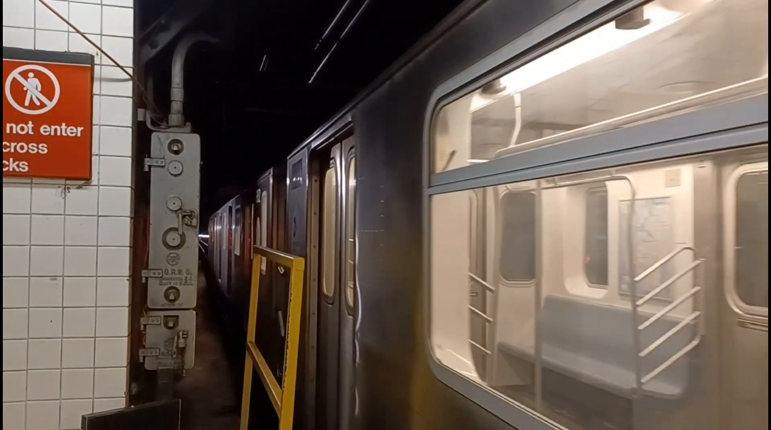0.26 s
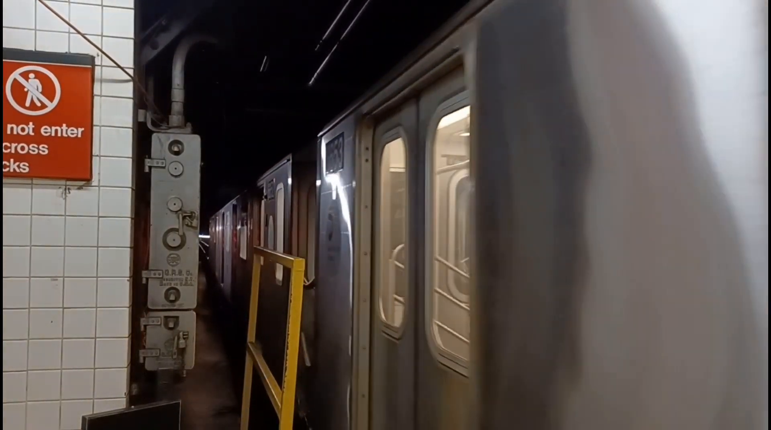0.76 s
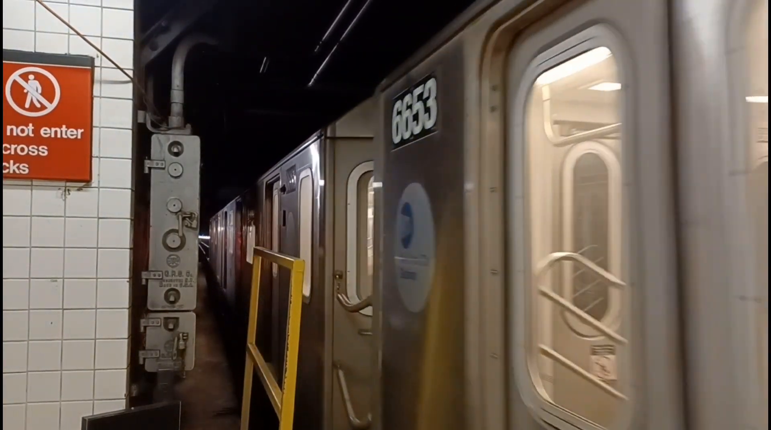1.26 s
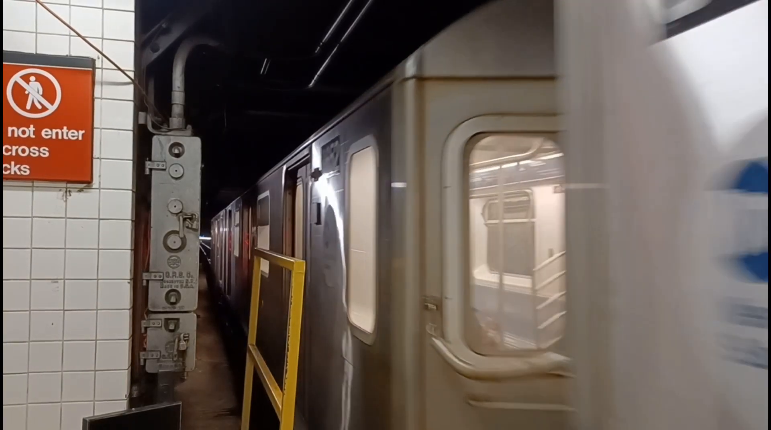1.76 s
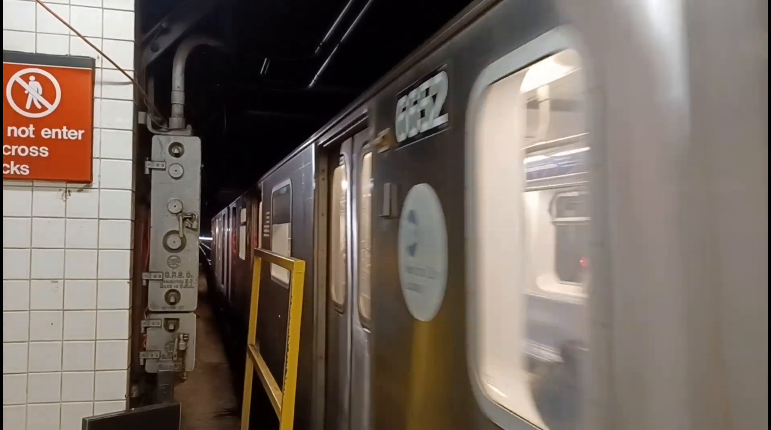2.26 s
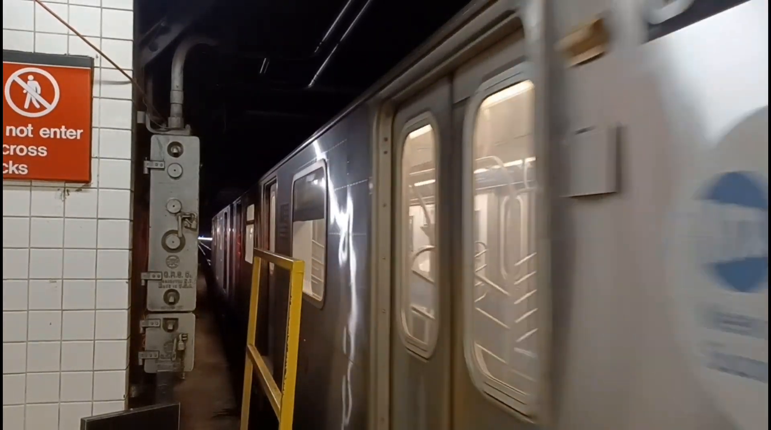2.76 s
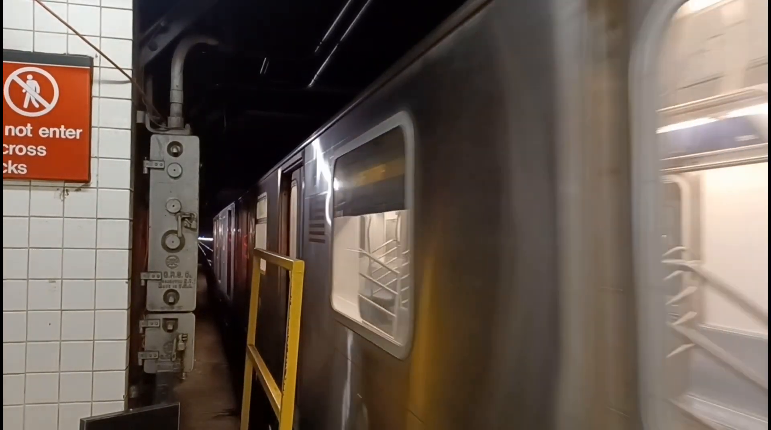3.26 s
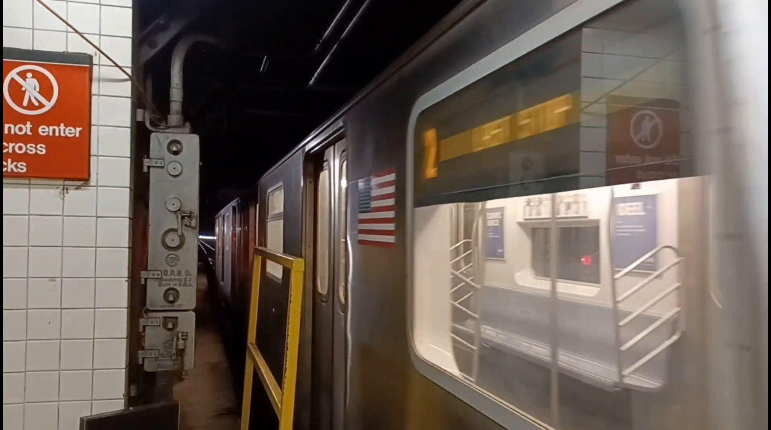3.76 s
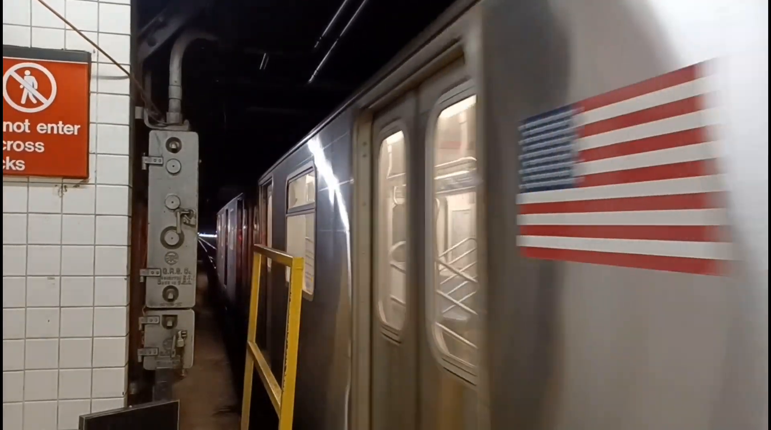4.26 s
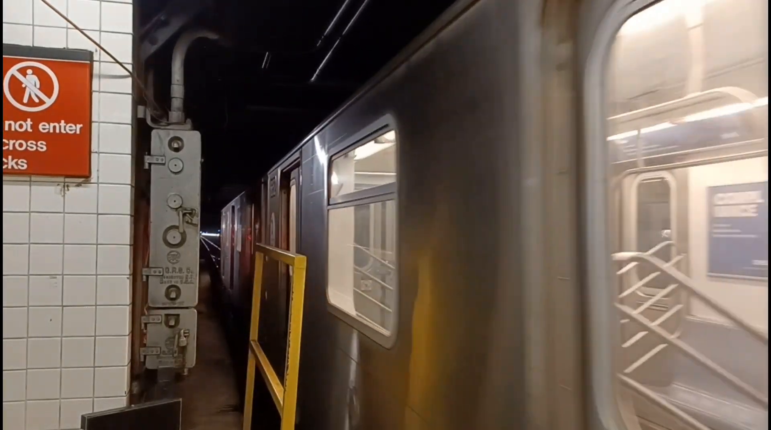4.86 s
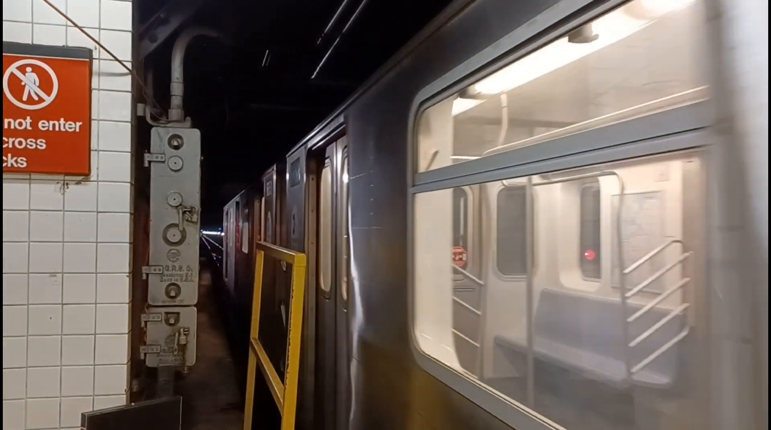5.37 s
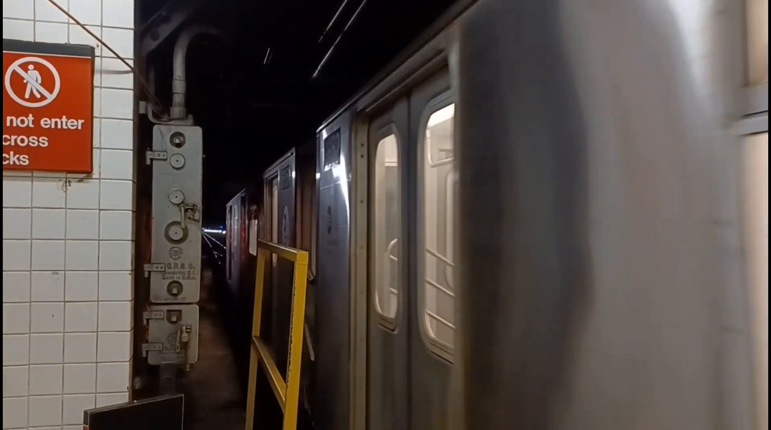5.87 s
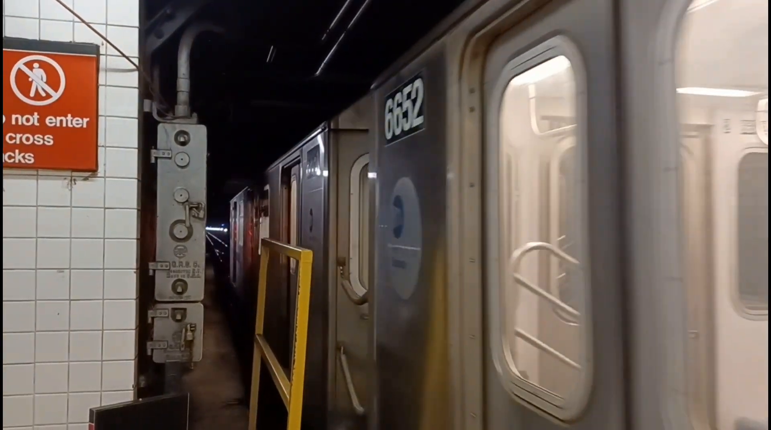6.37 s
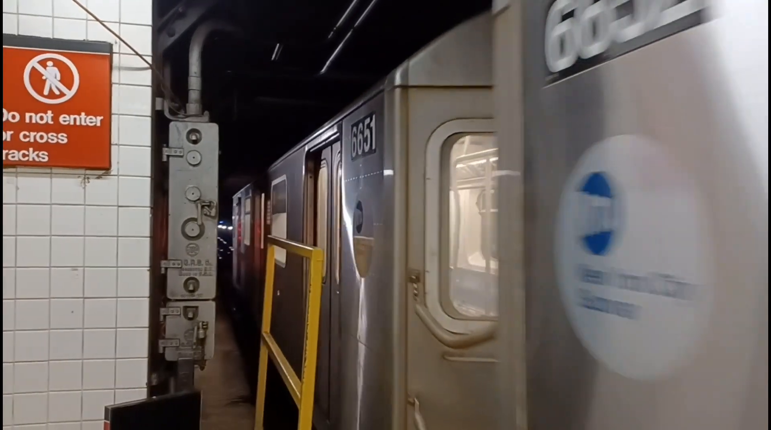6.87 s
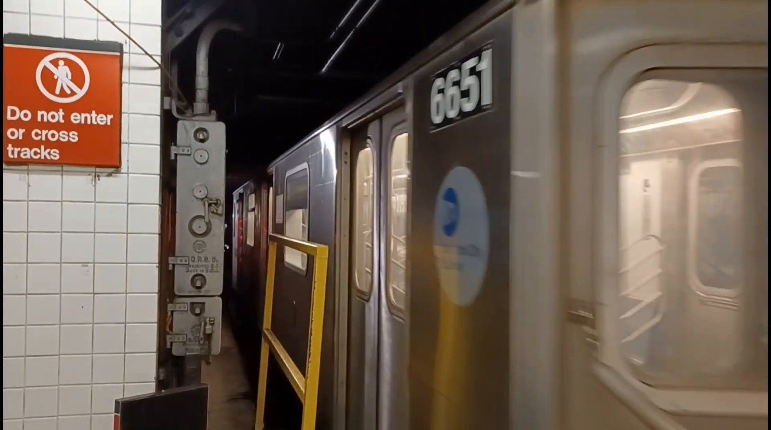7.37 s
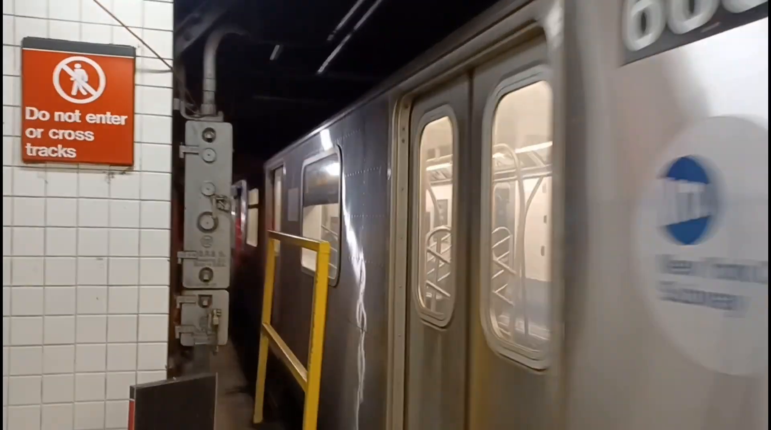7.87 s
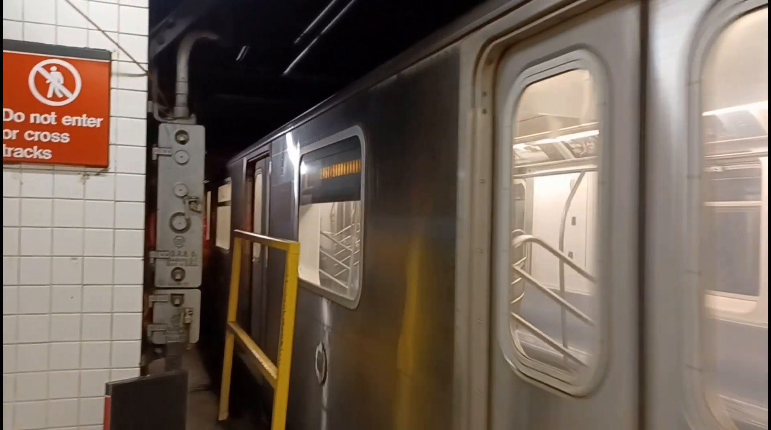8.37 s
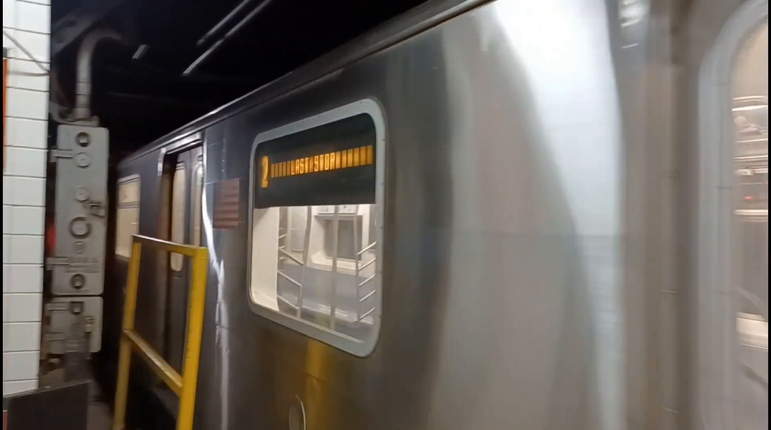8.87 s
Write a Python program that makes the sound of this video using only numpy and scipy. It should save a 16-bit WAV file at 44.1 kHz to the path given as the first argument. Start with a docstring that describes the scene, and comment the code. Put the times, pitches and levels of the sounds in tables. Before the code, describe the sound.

A steel train passes a nearby stereo microphone in a reverberant subway station. Loud, irregularly spaced wheel clacks land about every second, with deep body booms and brief faint squeals. A wavering high whine dies away early, leaving rolling rumble, hiss and low hum. A softer stretch in the middle gives way to more bangs, then weaker clacks and a scraping hiss near the end as cars still pass.

```python
"""At the end of a tiled underground platform, a subway train rolls past close by.
Wheels bang over a rail joint: shaped noise makes thud and clang, decaying modes make frame note and ring.
Car bodies boom, wheels squeal, and diffuse noise makes the rolling roar, hiss and air.
Echo-blurred tones make the inverter whine heard at first, the gears and fans, and the low hum.
The station smears every blow into a short roar, and a gain control ducks after the loud ones."""
import sys
import numpy as np
from scipy import signal
from scipy.fft import rfft, irfft, next_fast_len
from scipy.io import wavfile
from scipy.ndimage import uniform_filter1d

SR = 44100
rng = np.random.default_rng(int(sys.argv[2]) if len(sys.argv) > 2 else 0)


def store_wav(level_fs):
    """Save 16-bit WAV to argv[1]."""
    pcm = np.round(np.clip(np.atleast_2d(level_fs), -1, 1) * 32767)
    wavfile.write(sys.argv[1], SR, pcm.T.astype(np.int16))


N = 402633
TIME = np.arange(N) / SR


def amp(db):
    """Level: 20 dB make a factor of ten in amplitude."""
    return 10 ** (np.asarray(db) / 20)


def unit(x):
    """Root mean square: scales the signal to an rms of one."""
    return x / np.sqrt(np.mean(x ** 2) + 1e-20)


def at_hz(points, hz):
    """Spectral envelope: interpolates levels along a log-frequency axis."""
    f, value = np.transpose(points)
    return np.interp(np.log(hz + 1), np.log(f + 1), value)


def add(mix, s, sound):
    """Superposition: adds a stereo sound into the mix from time s, cut at the ends of the mix."""
    start = round(s * SR)
    sound = sound[:, max(-start, 0):]
    part = mix[:, max(start, 0):][:, :sound.shape[1]]
    part += sound[:, :part.shape[1]]


def wander(rate_hz, size=N):
    """Low-passed noise: a random drift of rms one with little change faster than rate_hz."""
    points, points_per_s = 8192, 800
    hz = np.fft.rfftfreq(points, 1 / points_per_s)
    low_pass = 1 / np.sqrt(1 + (hz / rate_hz) ** 6)
    slow = irfft(rfft(rng.standard_normal(points)) * low_pass)
    return unit(np.interp(TIME[:size], np.arange(points) / points_per_s, slow))


def likeness(hz, spacing_m=0.15):
    """Spatial coherence: in a diffuse field two spaced microphone ports agree only on long waves."""
    sound_speed = 343  # m/s
    return np.sinc(2 * hz * spacing_m / sound_speed)


def diffuse(spectrum, size=N):
    """Diffuse field: coloured noise from all sides at once, with partly coherent channels."""
    length = next_fast_len(size, True)
    hz = np.fft.rfftfreq(length, 1 / SR)
    mid, side = rfft(rng.standard_normal((2, length)))
    mid = mid * np.sqrt(1 + likeness(hz))
    side = side * np.sqrt(1 - likeness(hz))
    coloured = np.array([mid + side, mid - side]) * amp(at_hz(spectrum, hz))
    return unit(irfft(coloured, length)[:, :size])


def smeared_tone(hz, spread_hz, steady, size=N):
    """Multipath beating: a moving source's many echoes, each slightly shifted, beat with its direct tone."""
    turn = np.exp(2j * np.pi * np.cumsum(hz * np.ones(size)) / SR)
    mid, side = [wander(spread_hz, size) + 1j * wander(spread_hz, size) for _ in range(2)]
    same = likeness(np.mean(hz))
    mid = (steady + mid) * np.sqrt(1 + same)
    side = side * np.sqrt(1 - same)
    return unit((np.array([mid + side, mid - side]) * turn).real)


def struck(modes, seconds, scatter):
    """Modal decay: a blow excites damped sinusoids; no two wheels or bogies are tuned quite alike."""
    t = TIME[:round(seconds * SR)]
    hz, db, t60 = np.transpose(modes)[:, :, None]
    hz = hz * (1 + scatter * rng.standard_normal(hz.shape))
    decay = amp(db - 60 * t / t60) / np.sqrt(t60)
    phase = rng.random(hz.shape)  # in cycles
    return (decay * np.sin(2 * np.pi * (hz * t + phase))).sum(0)


def passing(s, half_s):
    """Bell-shaped swell: a gain of one at time s and one half at half_s to either side."""
    return 1 / (1 + ((TIME - s) / half_s) ** 2)


def swells(peaks, bed_db):
    """Incoherent addition: the powers of several swells add to that of a steady bed."""
    peak_power = sum((amp(db) * passing(s, half_s)) ** 2 for s, db, half_s in peaks)
    return np.sqrt(amp(bed_db) ** 2 + peak_power)


def clacks():
    """Impact at a rail joint: the wheel drops and rebounds, the bogie thuds, the rail clangs, the wheel rings."""
    # One row a wheel on the joint: t/s, relative thud level/dB, bogie note f/Hz,
    # clang level/dB, relative wheel ring level/dB, rebound delay t/s
    wheel_blows = [(-0.035, -11.5, 289.6, -22.5, -33.5, .02), (0.85, -8.5, 287.2, -13.5, -24, 0.0092),
                   (1.558, -12, 316.3, -15, -29.5, 0.034), (2.652, -23, 292, -28, -52, 0.016),
                   (3.318, -20, 443, -23, -56, 0.038), (4.165, -22.5, 281.7, -25, -42, 0.03),
                   (4.446, -7.5, 291.4, -13.5, -33, .038), (4.845, -23.5, 299, -27, -39.5, 0.028),
                   (5.14, -9, 285.2, -18.5, -39, 0.061), (6.025, -11, 275, -17.5, -32, 0.013),
                   (6.793, -10, 311, -16.5, -28, 0.051), (8.158, -22, 306, -26.5, -51, 0.057),
                   (9.105, -19.5, 296, -23.5, -44, .03)]
    # Colour of the bogie's dull thud: f/Hz, relative level/dB
    thud_colour = [(20, -65), (130, -16.5), (195, -13.5), (235, -10.5), (285, -2.5), (330, -4), (420, -9.5),
                   (520, -17), (900, -38.5), (3000, -82)]
    # Colour of the clang of rail and steel: f/Hz, relative level/dB
    clang_colour = [(20, -70), (200, -47), (400, -5), (520, 1), (630, -0.5), (745, 1.5), (840, -3),
                    (935, -1.5), (1130, -8), (1400, -12), (2200, -13), (3400, -22.5), (5000, -31.5),
                    (7500, -47), (15000, -60)]
    flat_colour = [(100, 0), (6000, 0)]
    rise_s, loud_db, rise_doubling_db = 0.015, -13, 26  # fainter, farther blows swell more slowly
    out = np.zeros((2, N))
    for s, thud_db, note_hz, clang_db, ring_db, rebound_s in wheel_blows:
        rise = rise_s * 2 ** ((loud_db - thud_db) / rise_doubling_db)
        thud = amp(-2) * blow(thud_colour, rise * 2.0, near_db=-6, station_t60=0.96,
                              rattle_db=-1, rebound_s=rebound_s)
        thud = thud + amp(-5.5) * knock(note_hz, rise * 2.9)
        clang = blow(clang_colour, rise, near_db=-8, station_t60=0.86,
                     rattle_db=-1.3, rebound_s=rebound_s)
        strike = blow(flat_colour, rise * 1.6, near_db=7.5, station_t60=0.68,
                      rattle_db=1.5, rebound_s=rebound_s)
        ring = amp(ring_db + 4.5) * wheel_ring(strike)
        add(out, s, amp(thud_db) * thud + amp(clang_db) * clang + ring)
    return out


def blow(spectrum, rise, near_db, station_t60, rattle_db, rebound_s=None):
    """Reverberant impact: near reflections build up and die, the station rings on, loose parts chatter."""
    def envelope(t):
        """Double-slope decay: a linear swell, then near and station reverberation added in power."""
        t = np.maximum(t, 0)
        near_t60 = .3  # s
        decay = np.hypot(amp(near_db - 60 * t / near_t60), amp(-60 * t / station_t60))
        return np.minimum(t / rise, 1) * decay
    level = envelope(TIME[:SR])
    if rebound_s is not None:
        rebound_db = -2  # the wheel lands a second time, more softly
        level = np.hypot(level, amp(rebound_db) * envelope(TIME[:SR] - rebound_s))
    chatter = amp(rattle_db * wander(65, size=SR))
    return level * unit(diffuse(spectrum, size=SR) * chatter)


def knock(note_hz, rise):
    """Frame resonance: the bogie's own note, heard directly and alike in both ears."""
    # Modes of the bogie frame: multiple of its note, relative level/dB, t60/s
    frame_modes = [(.7, -13, 0.36), (0.899, -5.5, 0.26), (1, -5.5, 0.44), (1.173, -9.5, 0.13),
                   (1.379, -3.5, 0.07)]
    modes = [(k * note_hz, db, t60) for k, db, t60 in frame_modes]
    ring = struck(modes, 1, scatter=0.013) * np.minimum(TIME[:SR] / rise, 1)
    return ring / np.std(ring[:SR // 10])


def wheel_ring(drive):
    """Convolution: the wheel's modal response to the force of a blow, so the ring swells just after it."""
    # Modes of a steel wheel: nominal f/Hz, relative level/dB, t60/s
    wheel_modes = [(748, 5, 0.12), (930, 5.5, 0.17), (1205, -30, 0.17), (1840, -0.5, 0.16),
                   (1960, -10, .12), (2460, -2.5, 0.2), (2430, -16, 0.071), (2746, -16, 0.13),
                   (3296, -8, .08), (4160, -9, 0.08), (5010, -13, 0.042)]
    response = struck(wheel_modes, .5, scatter=0.0028)
    out = signal.fftconvolve(drive, response[None], axes=1)[:, :SR]
    return out / np.std(out[:, :SR // 10])


def booms():
    """Body resonance: the car bodies give deep, soft knocks as they rock."""
    # Knocks of the car bodies: t/s, level/dB
    body_knocks = [(1.079, -9.5), (1.171, -14), (1.6, -24), (2.66, -18), (2.96, -25), (3.37, -27),
                   (4.455, -18), (5.17, -16), (6.241, -30)]
    # Colour of a knock: f/Hz, relative level/dB
    boom_colour = [(15, -60), (30, -36), (50, -18), (78, -5), (135, 3.5), (220, -4.5), (420, -12),
                   (700, -28), (3000, -80), (12000, -100)]
    out = np.zeros((2, N))
    for s, db in body_knocks:
        sound = blow(boom_colour, rise=0.019, near_db=-4, station_t60=0.56, rattle_db=-1)
        add(out, s, amp(db) * sound)
    return out


def squeals():
    """Flange friction: a rubbing wheel sings on one mode that catches quickly and fades, blurred by echoes."""
    # Singing wheels: t/s, length t/s, f/Hz, spread f/Hz, relative level/dB
    rubs = [(0, 0.52, 1175, 13, -52), (0.85, 0.28, 1872, 26, -35), (1.73, 0.37, 1217, 16, -45),
            (3.207, 0.3, 1246, 40, -46), (3.222, 0.34, 3570, 400, -50), (6.025, 0.16, 2480, 40, -40)]
    out = np.zeros((2, N))
    for s, length, hz, width_hz, db in rubs:
        progress = np.linspace(0, 1, round(length * SR))
        swell = (1 - np.exp(-progress / 0.051)) * np.sqrt(1 - progress)
        tone = smeared_tone(hz, width_hz, steady=0.59, size=len(progress))
        add(out, s, amp(db + 9.5) * swell * tone)
    return out


def rolling():
    """Roughness excitation: steel rolling on steel gives a lumpy roar, a hiss above it and airy noise on top."""
    # Course of the roar: t/s, relative level/dB
    roar_course = [(0.0, -26), (0.25, -30.5), (0.86, -27.5), (1.02, -22.5), (2.52, -29), (3.33, -24.5),
                   (4.6, -28.5), (4.86, -26.5), (6.58, -29.5), (6.94, -24), (7.6, -29.5), (9.13, -27.5)]
    # Colours of the roar, the hiss and the thin airy noise: f/Hz, relative level/dB
    roar_colour = [(15, -60), (30, -26), (42, -36), (60, -16), (85, -5.5), (160, -5), (220, -0.5), (300, 0),
                   (370, -5.5), (540, -12.5), (920, -14), (1250, -19.5), (2500, -34.5), (8000, -76)]
    hiss_colour = [(30, -59), (500, -4.5), (1300, -9), (1700, 3.5), (2200, -1), (3050, 0), (3700, -3),
                   (5100, -6.5), (6600, -14), (7600, -26), (10000, -25), (16000, -38)]
    air_colour = [(6000, -51), (7700, -16), (8700, -8), (10200, -4), (12500, 0.5), (14200, -3), (16000, -7)]
    # A wheel scrapes along the rail as it goes by: t/s when nearest, level/dB, half-width of swell t/s
    scrapes = [(3.299, -35, 0.12), (8.35, -32.5, 0.14), (8.9, -36.5, 0.85)]
    hiss_db, hiss_dip_db = -33.5, 1
    air_db, air_dip_db = -42.5, 1.5
    scrape_air_db = -11  # airy top of the scrapes, relative to their hiss
    roar_db = np.interp(TIME, *np.transpose(roar_course))
    roar = diffuse(roar_colour) * amp(roar_db + 2 + wander(16.5))
    ends = car_ends()
    hiss_gain = swells(scrapes, hiss_db - hiss_dip_db * ends)
    hiss = diffuse(hiss_colour) * hiss_gain * amp(0.76 * wander(14.4))
    airy_scrapes = [(s, db + scrape_air_db, half_s) for s, db, half_s in scrapes]
    air_gain = swells(airy_scrapes, air_db - air_dip_db * ends)
    air = diffuse(air_colour) * air_gain * amp(.5 * wander(60))
    return roar + hiss + air


def car_ends():
    """Periodic modulation: near one while the ends of two cars go by, near zero along the middle of a car."""
    first_s, period_s, half_s = 2.5, 5.3, 0.41
    offset = (TIME - first_s + period_s / 2) % period_s - period_s / 2
    return 1 / (1 + (offset / half_s) ** 8)


def inverter():
    """Switching harmonics: the traction inverter's whine wavers, dips briefly, then fades as a trace climbs."""
    # Partials of the whine: multiple of its note, relative level/dB
    partials = [(1, 0), (1.5, -17), (2, -14.5)]
    whine_hz, waver_hz = 2574, 11
    whine_db, end_s, fade_db_per_s = -30.5, 1.83, 40
    dip_s, dip_half_s, dip_db = 1.22, 0.056, 3.5
    glide_hz_per_s, glide_db, glide_s, glide_half_s = 660, -43, 2.5, 0.2
    since = np.maximum(TIME - end_s, 0)
    note_hz = whine_hz + waver_hz * wander(4.01)
    whine = sum(amp(db) * smeared_tone(k * note_hz, spread_hz=39, steady=0.5) for k, db in partials)
    level_db = whine_db - dip_db * passing(dip_s, dip_half_s) - fade_db_per_s * since
    glide_hz = whine_hz + glide_hz_per_s * np.minimum(since, 1)
    glide = smeared_tone(glide_hz, spread_hz=170, steady=0)
    return amp(level_db) * whine + amp(glide_db) * passing(glide_s, glide_half_s) * glide


def traction():
    """Pass-by tones: gears and fans swell and fall in pitch as each motor bogie passes."""
    # Motor bogies going by: t/s when nearest, gear whirr level/dB, fan whistle level/dB
    motors = [(0.349, -47, -51), (2.2, -39, -41.5), (5.7, -41.5, -44), (7.2, -45.5, -42.5)]
    s, gear_db, fan_db = np.transpose(motors)[:, :, None]

    def fly_by(hz, fall, half_s, db, spread_hz):
        """Power weighting: the strongest bogie leads the pitch, from the share fall above hz to as far below."""
        power = (amp(db) * passing(s, half_s)) ** 2
        total = power.sum(0)
        leaving = (power * np.tanh((TIME - s) / half_s / 2)).sum(0) / total
        return np.sqrt(total) * smeared_tone(hz * (1 - fall * leaving), spread_hz, steady=0)
    gears = fly_by(hz=1670, fall=.11, half_s=.35, db=gear_db, spread_hz=46)
    fans = fly_by(hz=3130, fall=.04, half_s=.6, db=fan_db, spread_hz=280)
    return gears + fans


def hum():
    """Beating tones: two low notes of the cars throb and swell, with a drone on two higher notes."""
    # Swells of the low throbbing hum: t/s at peak, relative level/dB, half-width t/s
    hum_swells = [(1.25, -22, 0.23), (3.35, -28, 0.25), (4.15, -22, 0.3), (5.02, -22.5, 0.089),
                  (7.2, -24.5, 0.77), (8.6, -29.5, 0.66)]
    # Swells of the drone: t/s at peak, upper note level/dB, lower note level/dB, half-width t/s
    drone_swells = [(2.251, -24, -45, 0.047), (3.3, -27.5, -28, .2), (3.95, -24.5, -29, .2),
                    (8.8, -45, -29.5, .6)]
    hum_bed_db, upper_bed_db, lower_bed_db = -32.5, -41.5, -38.5  # beneath the swells
    low = amp(-2.0) * smeared_tone(119.5, spread_hz=5.3, steady=1.32)
    low = low + amp(-3.5) * smeared_tone(128, spread_hz=8, steady=0.41)
    s, upper_db, lower_db, half_s = np.transpose(drone_swells)
    upper = swells(zip(s, upper_db, half_s), upper_bed_db) * smeared_tone(280, spread_hz=7.9, steady=1.5)
    lower = swells(zip(s, lower_db, half_s), lower_bed_db) * smeared_tone(197, spread_hz=10.3, steady=0.47)
    return swells(hum_swells, hum_bed_db) * low + upper + lower


def scene():
    """Interchannel level difference: all sources sum, with the train to one side, a tiled wall to the other."""
    # Stereo balance: f/Hz, left minus right level/dB
    balance = [(60, 0), (110, -2), (200, 0.5), (380, -0.7), (700, -0.2), (1280, -1.2), (2370, -2),
               (4370, -3.5), (7000, 4.5), (11000, -0.5), (15000, 2.5)]
    mix = clacks() + booms() + squeals() + rolling() + inverter() + traction() + hum()
    length = next_fast_len(N, True)
    lean_db = at_hz(balance, np.fft.rfftfreq(length, 1 / SR)) / 2
    return irfft(rfft(mix, length) * amp([lean_db, -lean_db]), length)[:, :N]


def record(dry):
    """Dynamic compression: gain falls fast on a loud blow and recovers over seconds; then clipping and a low-pass."""
    threshold_db, recovery_db_per_s = -15.5, 3.0
    share = 0.4  # dB of ducking per dB above the threshold
    start_over_db = 4  # the gain starts a little lowered
    edge_hz = 15500
    power = abs(uniform_filter1d((dry ** 2).mean(0), size=1500))
    power_db = 10 * np.log10(power + 1e-12)
    # a running maximum that sinks at the recovery rate
    fall = TIME * recovery_db_per_s
    held_db = np.maximum.accumulate(np.maximum(power_db + fall, threshold_db + start_over_db)) - fall
    over_db = uniform_filter1d(np.maximum(held_db - threshold_db, 0), size=600)
    ducked = dry / amp(share * over_db)
    low_pass = signal.firwin(511, edge_hz, window=("kaiser", 9), fs=SR)
    return signal.oaconvolve(np.clip(ducked, -1, 1), low_pass[None], "same")


dry = scene()
out = record(dry)
store_wav(out)
```